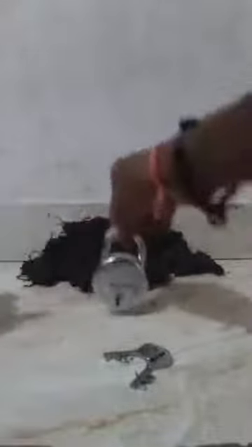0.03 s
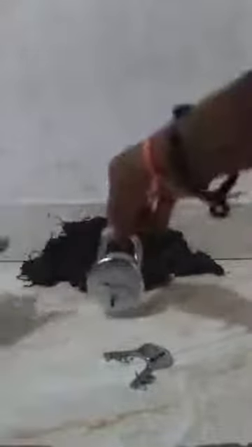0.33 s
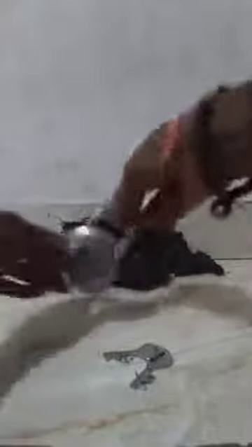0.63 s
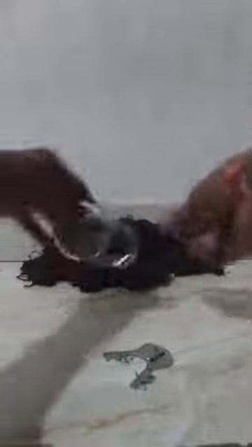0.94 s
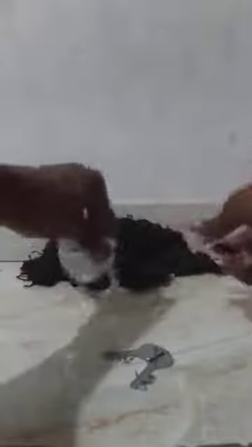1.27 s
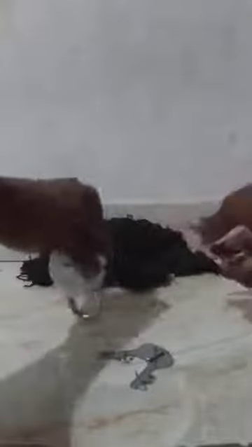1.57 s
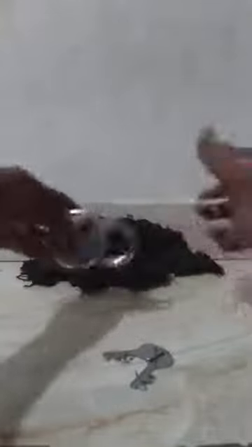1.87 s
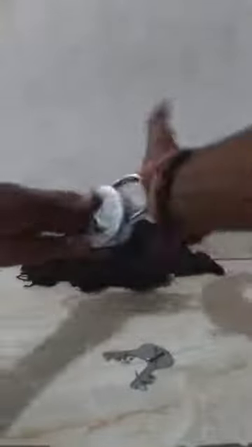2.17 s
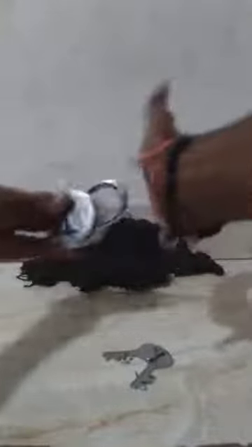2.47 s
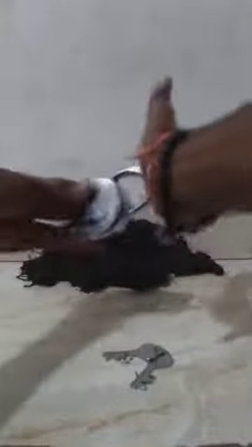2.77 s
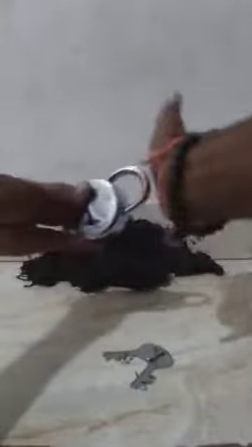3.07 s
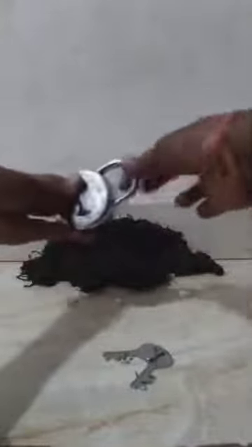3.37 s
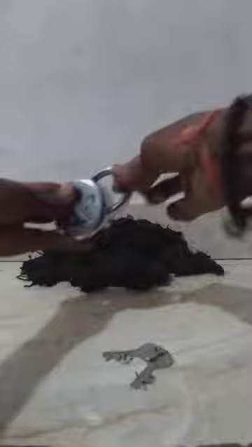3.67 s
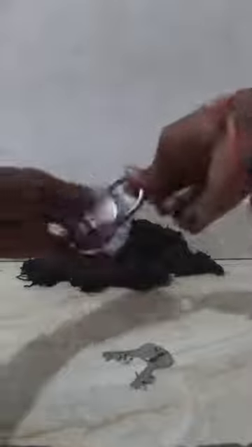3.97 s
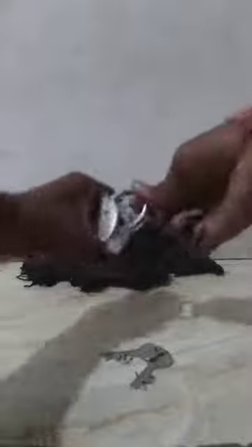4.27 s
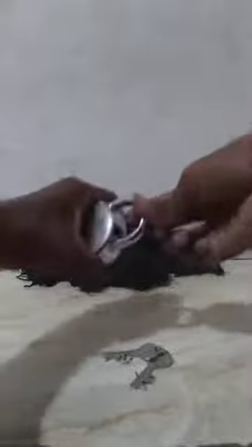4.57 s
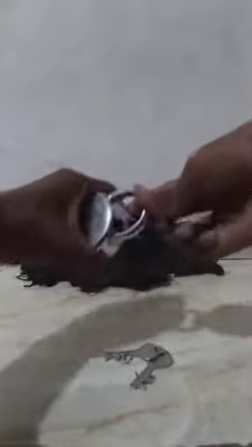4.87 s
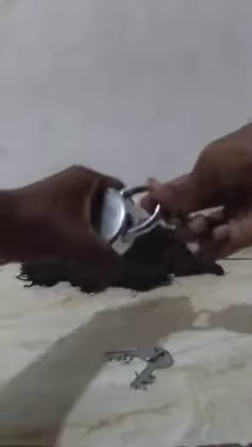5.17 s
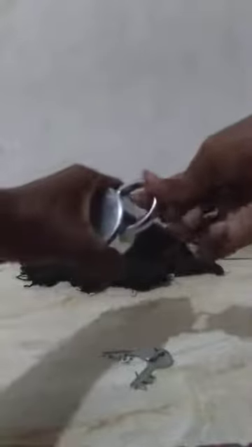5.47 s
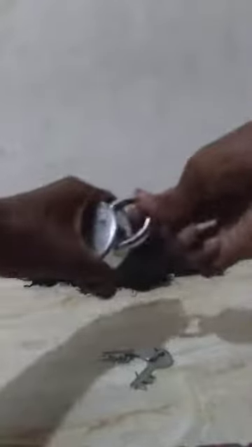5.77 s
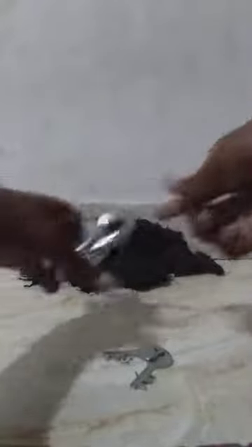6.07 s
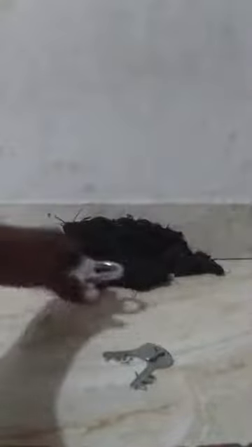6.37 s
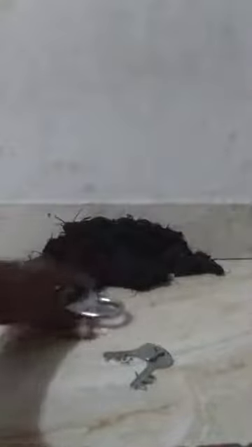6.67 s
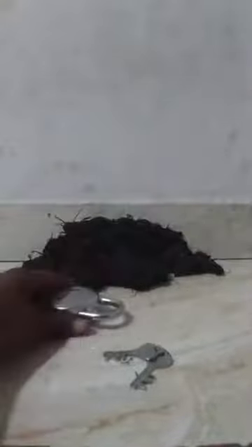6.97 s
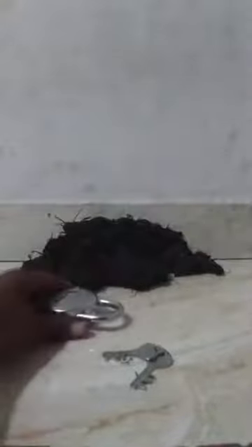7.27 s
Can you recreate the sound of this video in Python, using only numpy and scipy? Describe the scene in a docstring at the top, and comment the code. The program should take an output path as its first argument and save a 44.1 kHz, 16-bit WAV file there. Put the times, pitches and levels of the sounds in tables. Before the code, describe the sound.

Right at the start, a steel padlock is knocked on a stone floor three times in quick succession, hard thuds with a metallic edge and a short low boom. From about 1.2 to 1.6 seconds come three slightly softer, more clanking knocks. Between 2 and 3 seconds a palm slaps the shackle six times, evenly and growing a little louder, each clack followed by a small bright rebound. Faint clicks begin around 3.5 seconds as fingers tug the shackle. From 4.3 to 5.8 seconds they become a louder, uneven metallic rattle. A faint dull humming rush swells at about 4 seconds and fades near 7. At 6.6 seconds the lock is put down on the stone with a brief ringing clatter, leaving only a very faint hiss of fingers on steel. Everything is heard from close by on the floor, with the short reverberation of a small bare room.

```python
"""A padlock on a stone floor

In a small bare room a steel padlock is knocked on stone, three times on its base and three on its edge.
A palm slaps the shackle six times, fingers tug it to and fro in its play, and the lock is put down
with a ringing clatter. Each impact excites the modes of steel or stone, and the walls reverberate.
A dull rush swells and fades behind; two microphones stand close by on the floor."""
import sys
import numpy as np
from scipy import signal
from scipy.fft import rfft, irfft, next_fast_len
from scipy.io import wavfile
from scipy.ndimage import uniform_filter1d

SR = 44100
rng = np.random.default_rng(int(sys.argv[2]) if len(sys.argv) > 2 else 0)


def generate_wav(signal):
    """Clip the signal to [-1, 1] and save it as 16-bit WAV at the path in sys.argv[1]."""
    frames = np.transpose(np.atleast_2d(signal))
    scaled = np.clip(frames, -1, 1) * 32767
    pcm = np.round(scaled).astype(np.int16)
    wavfile.write(sys.argv[1], SR, pcm)


N = 322371
LEAD_S = .1   # room for a blow that falls just before time zero
LEAD = int(LEAD_S * SR)
TOTAL = N + LEAD
HIT_SIZE = 4096
HIT_HZ = np.fft.rfftfreq(HIT_SIZE, 1 / SR) + 1


def from_db(db):
    """Amplitude grows tenfold with every 20 dB."""
    return 10 ** (np.asarray(db) / 20)


def at_hz(points, hz):
    """Interpolation of (Hz, value) points along a logarithmic frequency axis."""
    points = np.array(points)
    return np.interp(np.log(hz + 1), np.log(points[:, 0]), points[:, 1])


def peaks_db(notes, hz):
    """Resonance peaks (Hz, width in Hz, dB) add as bell-shaped curves of gain in dB."""
    return sum(db / (1 + (2 * (hz - centre) / width) ** 2) for centre, width, db in notes)


def unit_energy(x):
    """Normalisation to a mean energy of one per channel."""
    return x / np.sqrt(np.sum(x ** 2) / 2 + 1e-20)


def add(track, s, sound):
    """Superposition: a stereo sound joins the track at s seconds."""
    start = max(int((s + LEAD_S) * SR), 0)
    track[:, start:start + sound.shape[1]] += sound[:, :TOTAL - start]


def diffuse_noise(size, apart_hz=900):
    """Spectrum of a diffuse field: two microphones are coherent in the bass, unrelated in the treble."""
    hz = np.fft.rfftfreq(size, 1 / SR)
    mid, side = rfft(rng.standard_normal((2, size)))
    coherence = .985 / (1 + (hz / apart_hz) ** 4)
    return hz, np.sqrt(1 + coherence) * mid + np.sqrt(1 - coherence) * side * [[1], [-1]]


def minimum_phase(magnitude):
    """Causality sets the phase for a given magnitude: nothing rings before the blow."""
    cepstrum = irfft(np.log(magnitude + 1e-9))
    cepstrum[..., 1:HIT_SIZE // 2] *= 2
    cepstrum[..., HIT_SIZE // 2 + 1:] = 0
    return np.exp(rfft(cepstrum))


def contact(modes, level_db, colour_db, chatter_s, first_touch, lag_s, sharpness=0.94):
    """Forced vibration: a burst of micro-impacts drives the modes, starting lag_s later on the right."""
    age = (np.arange(HIT_SIZE) / SR - np.array([[0], [lag_s]])) / chatter_s
    force = (age >= 0) * (first_touch + age ** 2) * np.exp(-np.abs(age))
    _, noise = diffuse_noise(HIT_SIZE)
    burst = rfft(irfft(noise) * force)
    burst_power = np.mean(np.abs(burst) ** 2, axis=0)
    ripple = np.sqrt(uniform_filter1d(burst_power, size=31) + 1e-12)
    mode_power = sum(from_db(db) ** 2 / (1 + ((HIT_HZ / hz - hz / HIT_HZ) * hz / width) ** 2) ** sharpness
                     for hz, width, db in modes)
    sound = irfft(burst * minimum_phase(np.sqrt(mode_power) * from_db(colour_db) / ripple))
    return from_db(level_db) * np.sqrt(.01 * SR) * unit_energy(sound)   # level as if spread over 10 ms


def hardness(clank_db, treble_db):
    """The place and hardness of a contact weight the steel's lower and upper modes."""
    tilt = [(800, 0.013), (1900, clank_db), (3000, clank_db),
            (4600, 0.014), (6200, 0.016), (7800, treble_db)]
    return at_hz(tilt, HIT_HZ)


# Modes of the floor and of the lock body. Each row: frequency in Hz, width in Hz, relative level in dB.
STONE_MODES = [(302, 39, 0), (443, 100, -11.5), (620, 170, -6.5), (1091, 91, 0.5), (1483, 220, -4),
               (2030, 220, -10)]
BODY_MODES = [(845, 160, -7.5), (1470, 140, -9), (2316, 185, -1.5), (2976, 300, -5), (3930, 580, -6.5),
              (4740, 610, -2), (5490, 400, -4.5), (6320, 580, -10), (8190, 960, -9.5), (10120, 600, -7.5),
              (12160, 1100, -2.5), (13400, 750, 2.5), (15200, 850, -3)]
# Dull echoes of the thud. Each row: delay in seconds, frequency in Hz, width in Hz, gain in dB.
THUD_ECHOES = [(.037, 632, 139.8, -21), (.052, 1105, 89.5, -17.5)]
# How each face meets the stone. Each row: thud gain, thud brightness, boom gain, steel gain,
# clank tilt, treble tilt and ring gain, all in dB, then two favoured notes in Hz.
LOCK_FACES = {"base": (0, 0.5, -23.5, -9, 12, -10.5, -41.5, 9970.5, 2500),
              "edge": (0, 4.5, -23, 0, 6.5, -18.5, -33, 2299.5, 1520),
              "flat": (-1, -3, -18.5, -2.5, 4, -4, -23.5, 8500.5, 5271),
              "bow": (-5, -8.5, -30, 0, 6.5, -6, -20.5, 5270, 5484)}
# Blows on the stone. Each row: start in seconds, relative level in dB, face that strikes.
FLOOR_KNOCKS = [(-0.012, -8, "base"), (0.217, -11, "base"), (0.4309, -12, "base"), (1.196, -16, "edge"),
                (1.3966, -15.5, "edge"), (1.5727, -15.5, "edge"), (6.553, -40, "bow"),
                (6.5592, -14.5, "flat"), (6.572, -17.5, "bow"), (6.579, -19, "flat"), (6.594, -25.5, "bow"),
                (6.611, -19.5, "flat")]


def knocks(boom_db=11, note_db=6, note_width_hz=300):
    """Impact excites both bodies: stone thuds and steel clanks, then echoes, boom and ring linger."""
    hits, lingering = np.zeros((2, 2, TOTAL))
    low_notes = boom() * np.ones((2, 1))
    blows = []
    for s, level, face in FLOOR_KNOCKS:
        thud, bright, low, steel, clank, treble, ring, *notes_hz = LOCK_FACES[face]
        soft = at_hz([(60, -13.5), (140, -3), (260, -1), (700, 1.0), (1100, bright), (2000, bright),
                      (3500, -7.5), (8000, -28.0)], HIT_HZ)
        favoured = peaks_db([(hz, note_width_hz, note_db) for hz in notes_hz], HIT_HZ)
        hard = hardness(clank, treble) + favoured
        add(hits, s, contact(STONE_MODES, level + thud, soft,
                             chatter_s=0.0013, first_touch=2.4, lag_s=.0001))
        add(hits, s, contact(BODY_MODES, level + steel, hard,
                             chatter_s=0.0018, first_touch=0.85, lag_s=0.00036))
        add(lingering, s, from_db(level + low + boom_db) * low_notes)
        for delay, hz, width, db in THUD_ECHOES:
            add(lingering, s + delay, contact([(hz, width, 0)], level + thud + db, soft,
                                              chatter_s=0.0019, first_touch=0.89, lag_s=0))
        blows.append((s, level + ring, notes_hz))
    return hits, lingering + ringing(blows)


# Low modes of floor and room. Each row: frequency in Hz, relative level in dB, 60 dB decay in seconds.
BOOM_MODES = [(205.5, -20, 0.43), (252.6, -9, 0.41), (294, -0.5, 0.39), (314, 4, 0.35), (358, -11.5, 0.51),
              (425, -19.5, 0.31), (541, -16, 0.24), (634, -11.5, 0.26), (1096, -1.5, 0.1)]


def boom(build_s=.008):
    """Beating: neighbouring low modes build up after a knock and interfere as they decay."""
    t = np.arange(int(.7 * SR)) / SR
    notes = sum(from_db(db - 60 * t / t60) * np.sin(2 * np.pi * hz * (t - build_s))
                for hz, db, t60 in BOOM_MODES)
    return notes * (1 - np.exp(-t / build_s))


# Lasting modes of the steel. Each row: frequency in Hz, relative level in dB, 60 dB decay in seconds.
RING_MODES = [(2213, -5, 0.33), (2296, -0.5, 0.31), (2600, -3, .33), (2670, -2.5, .3), (2920, -3.5, .28),
              (3350, -2, .28), (4690, 1.5, 0.33), (4910, 0, .32), (5220, -1.5, .38), (5320, -0.5, 0.53),
              (5510, -1, 0.29), (6360, 1, .3), (10000, -4.5, .35)]


def ringing(blows, favour_db=12, favour_width_hz=260, scatter_db=3):
    """Free vibration follows each blow (s, dB, notes); the grip leaves modes near its notes freest."""
    out = np.zeros((2, TOTAL))
    starts = [int((s + LEAD_S) * SR) for s, *_ in blows]
    shape = (len(blows), len(RING_MODES), 2)
    scatter = from_db(scatter_db * rng.standard_normal(shape)) * rng.choice([-1, 1], shape)
    for k, (hz, db, t60) in enumerate(RING_MODES):
        strike_db = [level + db + peaks_db([(note, favour_width_hz, favour_db) for note in notes], hz)
                     for _, level, notes in blows]
        strikes = np.full((2, TOTAL), 1e-18)
        strikes[:, starts] = from_db(strike_db) * scatter[:, k].T
        decay, angle = from_db(-60 / (t60 * SR)), 2 * np.pi * hz / SR   # per sample
        out += signal.lfilter([0, np.sin(angle)], [1, -2 * decay * np.cos(angle), decay ** 2], strikes)
    return out


# Decay of the room. Each row: frequency in Hz, reverberation time in seconds.
REVERB_TIMES = [(150, .5), (500, 0.46), (1200, 0.5349), (2400, 0.5332), (5000, .5), (9000, 0.47),
                (15000, 0.35)]
# Strength of its echoes. Each row: frequency in Hz, gain in dB.
REVERB_GAINS = [(100, -6.5), (300, -2.5), (700, -6.5), (1300, -13.5), (2500, -5), (5000, -8.5),
                (9000, -4.5), (15000, -13.5)]


def room(x, gap_s=0.0014, build_s=0.00083):
    """Reverberation: dense reflections from bare walls die exponentially, each band at its own rate."""
    size = 2 ** 15
    t = np.arange(size) / SR
    hz, noise = diffuse_noise(size)
    centres = np.geomspace(60, 16000, num=17)
    onset = 1 - np.exp(-np.maximum(t - gap_s, 0) / build_s)
    response = 0
    for centre, pick in zip(centres, np.eye(len(centres))):
        band = irfft(noise * at_hz(np.c_[centres, pick], hz))
        decay = onset * from_db(-60 * t / at_hz(REVERB_TIMES, centre))
        response += band * decay / np.linalg.norm(decay) * from_db(at_hz(REVERB_GAINS, centre))
    return signal.fftconvolve(x, response, axes=1)[:, :TOTAL]


def coloured_noise(spectrum, notes=()):
    """Spectral shaping gives diffuse noise a colour; its rms is one."""
    hz, noise = diffuse_noise(next_fast_len(N, True))
    colour = from_db(at_hz(spectrum, hz) + peaks_db(notes, hz))
    return np.sqrt(N) * unit_energy(irfft(noise * colour)[:, :N])


# Spectra of the steady air and the dull rush. Each row: frequency in Hz, relative density in dB.
AIR_SPECTRUM = [(25, -11.5), (60, -21), (100, 4.5), (150, -11), (300, -1), (450, -6.5), (1200, -14.5),
                (3000, -19), (6500, -23.5), (8000, -35.5), (16000, -34)]
RUSH_SPECTRUM = [(25, -18.5), (60, -19.5), (100, -5.5), (140, -13.5), (320, -4), (430, -5), (800, -10.5),
                 (1200, -14.5), (1700, -13.5), (3000, -19), (6500, -23.5), (8000, -36), (16000, -34.5)]
# Notes that hum within the rush. Each row: frequency in Hz, width in Hz, boost in dB.
RUSH_HUM = [(102, 19, 6), (190.4, 21, 11.5), (292.2, 19, 13), (765, 30, 6.5), (1600, 7.5, 7),
            (1720, 29, 6.5), (2370, 74, 4)]
# Rise and fall of the rush. Each row: time in seconds, level in dB.
RUSH_SWELL = [(0, -80.5), (2.6, -63), (3.9, -58.5), (4.35, -50), (5.0, -48), (6.45, -50), (7.0, -58)]


def background(air_db=-65.5):
    """Broadband noise: the air is steady, while a slow envelope swells and fades the humming rush."""
    air = from_db(air_db) * coloured_noise(AIR_SPECTRUM)
    swell = from_db(np.interp(np.arange(N) / SR, *np.transpose(RUSH_SWELL)))
    return air + swell * coloured_noise(RUSH_SPECTRUM, RUSH_HUM)


def clicks(rows, modes, gain_db, note_db, note_width_hz, chatter_s, first_touch, lag_s,
           room_sharpness, ring_db, note_scatter=0.024):
    """Hand-damped steel: each click reaches the microphones with two ringing notes, while the room hears a
    blunter click."""
    direct, radiated = np.zeros((2, 2, TOTAL))
    pan = from_db([[-.3], [.3]])
    # small parts radiate little bass
    radiation_db = at_hz([(100, -14.5), (1200, 0.5), (2200, 0), (3600, -3.0), (5500, -2.0),
                          (6600, -1.5), (8000, -4.5)], HIT_HZ)
    for s, level, clank, treble, *notes_hz in rows:
        notes = [(hz * (1 + note_scatter * rng.normal()), note_width_hz, note_db) for hz in notes_hz]
        colour = hardness(clank, treble)
        # the highest modes shift with the way the parts touch
        shifted = [(hz * (1 + (hz > 7000) * rng.uniform(-.05, .05)), width, db)
                   for hz, width, db in modes]
        click = contact(shifted, level + gain_db, colour + peaks_db(notes, HIT_HZ),
                        chatter_s, first_touch, lag_s)
        add(direct, s - chatter_s / 2, click * pan)   # starts about 0.5 ms early and rises softly
        add(radiated, s, contact(shifted, level, colour + radiation_db,
                                 chatter_s, first_touch, lag_s, room_sharpness))
    blows = [(s, level + ring_db, notes_hz) for s, level, _, _, *notes_hz in rows]
    return direct + ringing(blows, favour_db=4.5), radiated


# Modes of the shackle. Each row: frequency in Hz, width in Hz, relative level in dB.
SHACKLE_MODES = [(930, 530, -14), (2152, 94, -3), (2620, 280, -1), (3110, 230, -6), (4803, 270, -1.5),
                 (5460, 490, -0.5), (6110, 510, -9.5), (6900, 250, -15.5), (7840, 510, -26),
                 (12370, 2400, -8), (14300, 270, -3.5), (16600, 510, -6)]
# Pulled against the bolt the shackle rings, pushed home it snaps, sideways it clanks.
# Each row: clank tilt in dB, treble tilt in dB, upper note in Hz, lower note in Hz.
SHACKLE_CATCHES = {"slack": (-4, 2, 5005, 2320), "pull": (-4.5, -3.3, 5545, 2400),
                   "push": (-4, 5, 5450, 2653), "side": (4.2, 1.6, 4870, 2700)}
# Tugs to and fro. Each row: start in seconds, relative level in dB, where the shackle catches.
SHACKLE_TUGS = [(0.709, -57.5, "pull"), (3.4527, -32, "slack"), (3.5185, -31.5, "slack"),
                (3.6073, -30.5, "slack"), (3.656, -33, "slack"), (3.681, -36, "slack"),
                (3.7603, -31, "slack"), (3.893, -34, "slack"), (4.1147, -48, "push"), (4.2799, -23, "pull"),
                (4.3728, -20.5, "push"), (4.514, -24, "side"), (4.5339, -19, "pull"), (4.6014, -33, "pull"),
                (4.6278, -22, "push"), (4.772, -21.5, "pull"), (4.783, -31, "side"), (4.8693, -22, "push"),
                (4.9824, -22.5, "side"), (5.0142, -21.5, "pull"), (5.1062, -24, "push"),
                (5.2054, -24.5, "side"), (5.2382, -28, "pull"), (5.2775, -32, "pull"),
                (5.3271, -24, "push"), (5.6402, -25, "side"), (5.708, -19.5, "pull"), (5.755, -39, "side"),
                (5.8398, -27.5, "push")]


def tugs(tick_db=-37):
    """Backlash: the shackle crosses its play and strikes a stop; loose parts tick faintly in between."""
    ticks = [(s, tick_db, "side") for s in rng.uniform(4.75, 5.3, size=3)]
    rows = [(s, level, *SHACKLE_CATCHES[catch]) for s, level, catch in SHACKLE_TUGS + ticks]
    return clicks(rows, SHACKLE_MODES, gain_db=-1.5, note_db=12, note_width_hz=290, chatter_s=.00095,
                  first_touch=0.3, lag_s=0.0014, room_sharpness=0.9, ring_db=-32.5)


# The holding hand bumps the floor. Each row, by face: gain on the knock in dB, pitch in Hz.
HAND_THUMPS = {"edge": (-32, 100), "flat": (-14.5, 196)}


def thumps(palm_db=-25.5, palm_hz=75, palm_width_hz=160, hand_width_hz=41):
    """Soft impact excites low frequencies: flesh bumps dully on the floor and with every slap."""
    out = np.zeros((2, TOTAL))
    palm = [(s, level + palm_db, palm_hz, palm_width_hz) for s, level, *_ in PALM_SLAPS]
    hand = [(s, level + HAND_THUMPS[face][0], HAND_THUMPS[face][1], hand_width_hz)
            for s, level, face in FLOOR_KNOCKS if face in HAND_THUMPS]
    for s, level, hz, width in palm + hand:
        add(out, s, contact([(hz, width, 0)], level, colour_db=-2,
                            chatter_s=0.0011, first_touch=0.37, lag_s=0, sharpness=1.17))
    return out


# The palm throws the shackle against the body. Each row: start in seconds, relative level in dB,
# time of the rebound in seconds, lower note in Hz, upper note in Hz.
PALM_SLAPS = [(2.0106, -27, 2.043, 2350, 4360), (2.1899, -25, 2.2325, 2320, 4900),
              (2.3818, -25.5, 2.4207, 2900, 4900), (2.579, -25.5, 2.6212, 2530, 4700),
              (2.7678, -23, 2.8062, 2790, 4650), (2.9629, -20.5, 3.0086, 2900, 5170)]


def shackle_on_body(fall_s=.0415, fall_db=-24, fall_notes_hz=(2250, 4650), rebound_db=-8):
    """Rebound: the shackle falls back after edge knocks and bounces, weaker and brighter, after slaps."""
    fall_tilt, slap_tilt, rebound_tilt = (2.8, 2), (0, -0.88), (-6.5, 2.3)   # clank and treble in dB
    rows = [(s + fall_s, level + fall_db, *fall_tilt, *fall_notes_hz)
            for s, level, face in FLOOR_KNOCKS if face == "edge"]
    for s, level, rebound_s, *notes_hz in PALM_SLAPS:
        rows.append((s, level, *slap_tilt, *notes_hz))
        rows.append((rebound_s, level + rebound_db, *rebound_tilt, *notes_hz))
    return clicks(rows, BODY_MODES, gain_db=2.5, note_db=8.0, note_width_hz=270, chatter_s=.0012,
                  first_touch=0.24, lag_s=0.0013, room_sharpness=0.96, ring_db=-26)


# Spectrum of skin sliding on steel. Each row: frequency in Hz, relative density in dB.
SKIN_SPECTRUM = [(1000, -42), (4000, -11), (6500, -4), (9000, -10), (12500, 3), (15500, -2)]
# Shifts of the grip. Each row: time of the peak in seconds, peak level in dB.
GRIP_SLIDES = [(4.1, -71.5), (5.35, -62), (5.801, -70), (6.4, -67), (7.25, -63)]


def finger_slides(rise_db_per_s=56, fall_db_per_s=91):
    """Friction noise: fingers hiss over the steel, building slowly and stopping more quickly."""
    t = np.arange(N) / SR
    envelope = sum(from_db(db - np.maximum(rise_db_per_s * (s - t), fall_db_per_s * (t - s)))
                   for s, db in GRIP_SLIDES)
    return envelope * coloured_noise(SKIN_SPECTRUM)


def scene(tug_room_db=-6):
    """Superposition of the lock, its echoes and the background, all a little louder on the right."""
    balance = from_db([[-.8], [.8]])
    knocked, lingering = knocks()
    slapped, slap_spill = shackle_on_body()
    tugged, tug_spill = tugs()
    echoes = room(knocked + slap_spill + from_db(tug_room_db) * tug_spill)
    lock = slapped + tugged + balance * (knocked + lingering + thumps() + echoes)
    return lock[:, LEAD:] + balance * (background() + finger_slides())


def record(dry, cutoff_hz=15900):
    """Soft saturation rounds the highest peaks, and a steep low-pass filter cuts the top."""
    rounded = dry / (1 + dry ** 4) ** .25
    low_pass = signal.ellip(10, .2, 80, cutoff_hz, fs=SR, output="sos")
    return signal.sosfilt(low_pass, rounded, axis=-1)


dry = scene()
out = record(dry)
generate_wav(out)
```